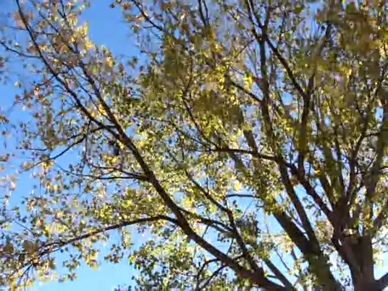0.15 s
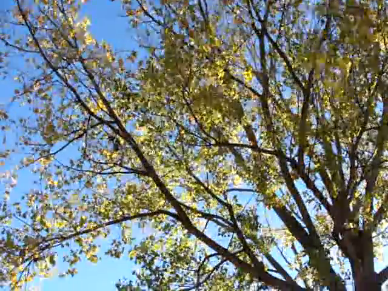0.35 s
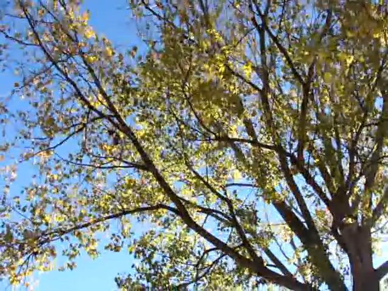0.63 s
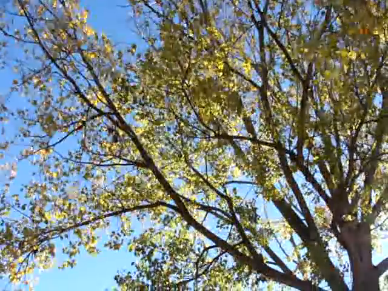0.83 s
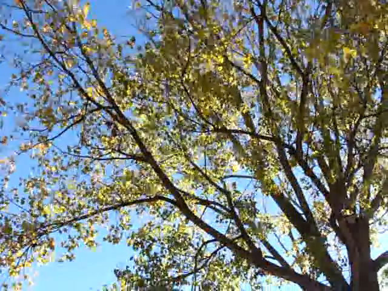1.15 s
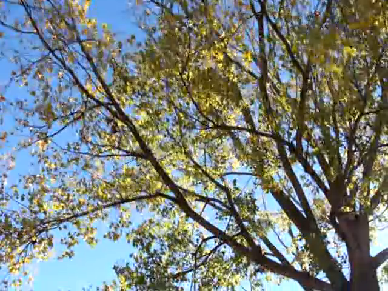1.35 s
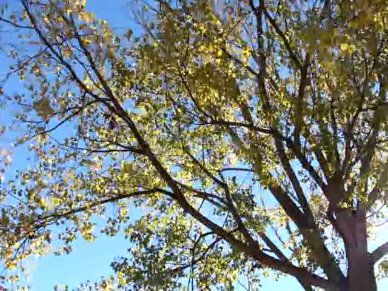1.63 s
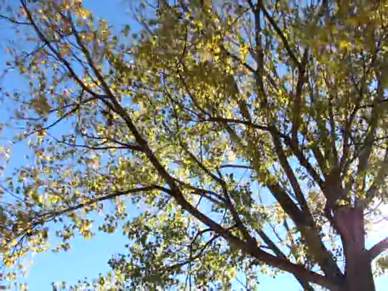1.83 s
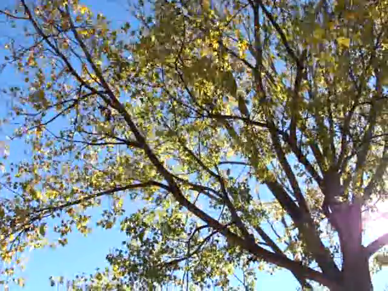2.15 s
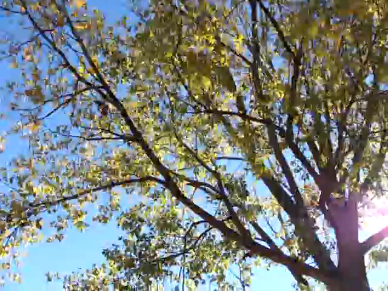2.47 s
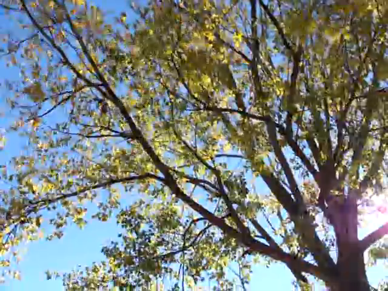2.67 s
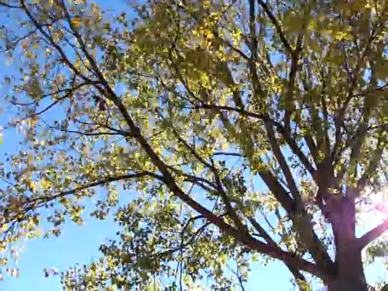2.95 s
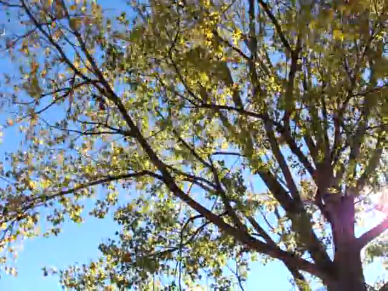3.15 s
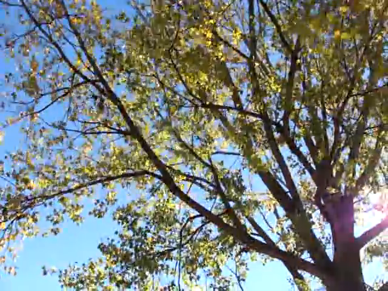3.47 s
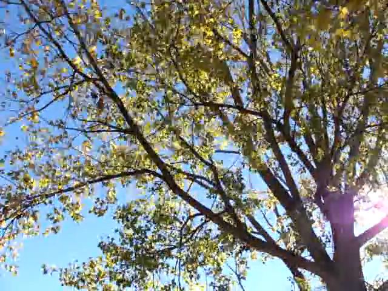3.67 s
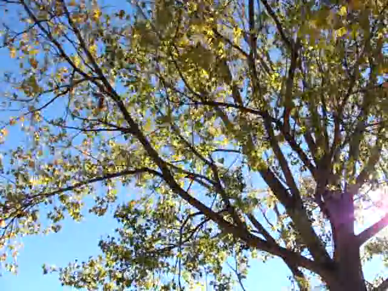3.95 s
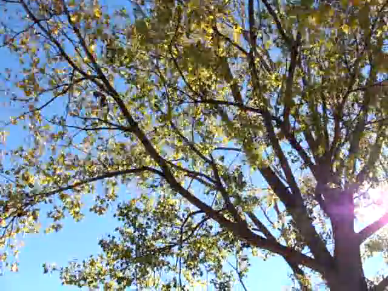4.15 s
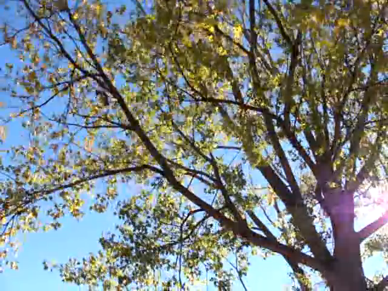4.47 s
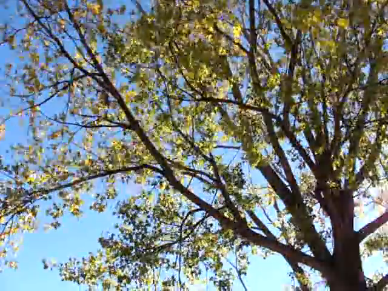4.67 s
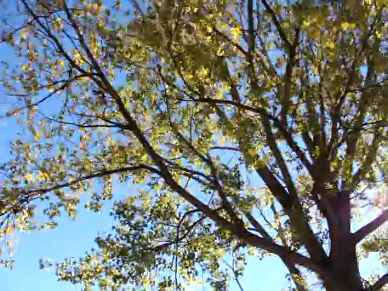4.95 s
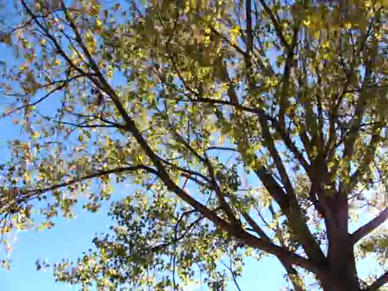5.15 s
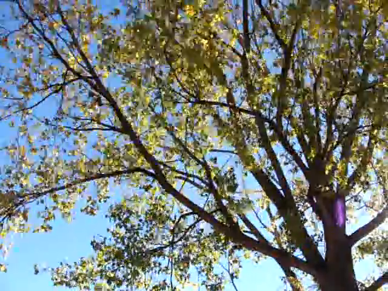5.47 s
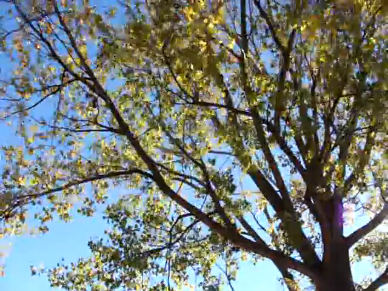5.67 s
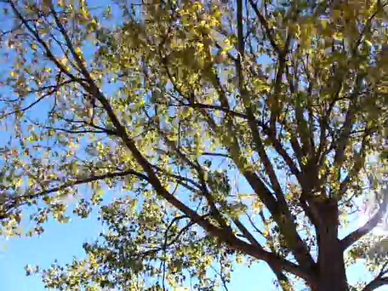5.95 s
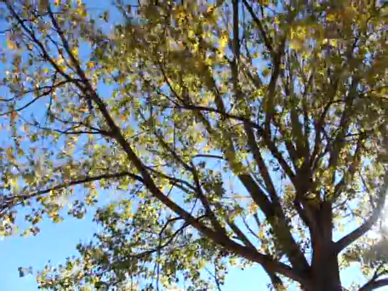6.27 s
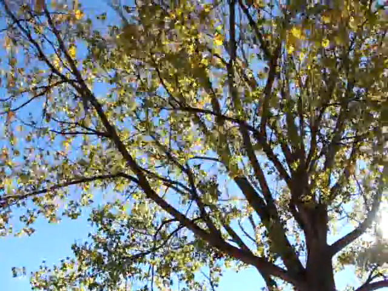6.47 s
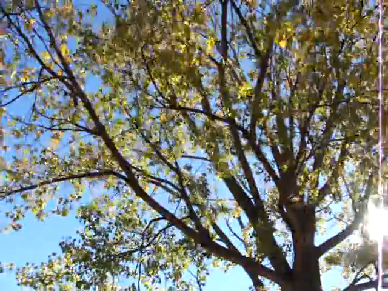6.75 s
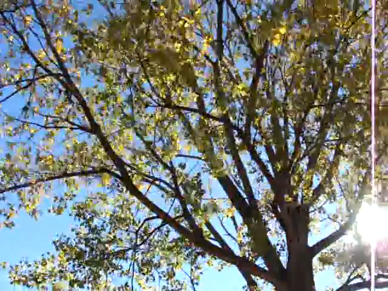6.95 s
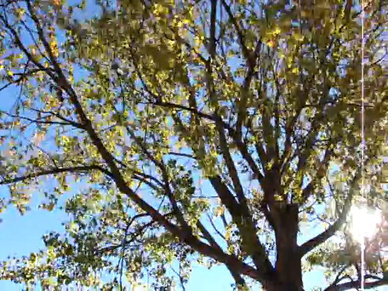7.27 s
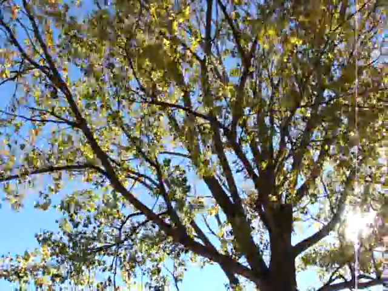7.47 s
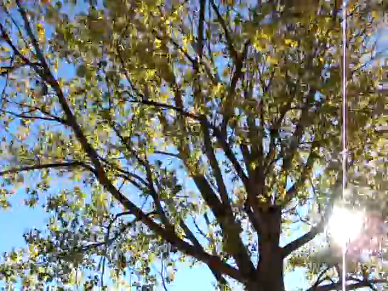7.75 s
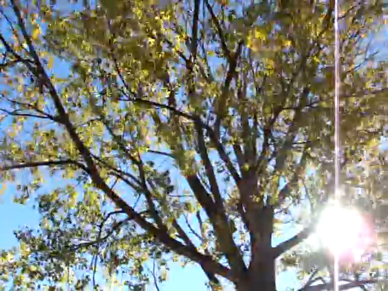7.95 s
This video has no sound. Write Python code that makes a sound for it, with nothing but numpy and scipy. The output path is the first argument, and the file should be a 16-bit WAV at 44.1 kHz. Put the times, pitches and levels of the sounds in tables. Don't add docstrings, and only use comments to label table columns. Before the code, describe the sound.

A continuous dry rustle of countless leaves fills about eight seconds outdoors, a mid-high hiss with fine crackling taps over a faint, dull, distant murmur of air. It begins soft, rises gradually, and levels off from about 5.3 seconds to the end. Low wind noise strikes the small single microphone in irregular lumps: soft puffs and thumps from 0.1 to 1.2 seconds, then a calmer stretch of mostly leaves. A short buffet comes around 3.2 to 3.4, followed by another lull. From about 4.7 the gusts strengthen, with rumbling flutter and heavy, blunt thumps, strongest near 5.2 to 5.3 and again 5.7 to 6.1. One more knock falls near 6.4, then gentler puffs around 6.8, 7.1 and 7.6, and a little rumble at the end. The sound is centred and close, with coarse, slightly watery, cut-off treble and no reverberation.

```python
import sys
import numpy as np
from scipy import signal
from scipy.fft import rfft, irfft, next_fast_len
from scipy.io import wavfile
from scipy.ndimage import uniform_filter1d, map_coordinates

SR = 44100
rng = np.random.default_rng(int(sys.argv[2]) if len(sys.argv) > 2 else 0)


def field_ratio(decibels):
    return 10 ** (np.asarray(decibels, dtype=float) / 20)


def persist_wave(psi):
    counts = np.round(np.clip(psi, -1, 1) * 32767).astype(np.int16)
    wavfile.write(sys.argv[1], SR, np.atleast_2d(counts).T)


N = 357651


def unit(x):
    return x / np.sqrt(np.mean(x ** 2) + 1e-20)


def curves(rows):
    s, *columns = np.transpose(rows)
    return [np.interp(np.arange(N) / SR, s, column) for column in columns]


def wobble(knots_per_s):
    return map_coordinates(rng.standard_normal(1000), [np.arange(N) * min(knots_per_s, 120) / SR])


def filtered(x, response):
    size = next_fast_len(N + 8192)
    gain = response(np.fft.rfftfreq(size, 1 / SR))
    return irfft(rfft(x, size) * gain, size)[..., :N]


def coloured(x, spectrum):
    point_hz, point_db = np.transpose(spectrum)
    return unit(filtered(x, lambda hz: field_ratio(np.interp(np.log(hz + 1), np.log(point_hz + 1), point_db))))


def patchy(depth_db):
    bins = signal.stft(rng.standard_normal(N), nperseg=512)[2]
    field = uniform_filter1d(rng.standard_normal(bins.shape), size=10, axis=0)
    field = uniform_filter1d(field, size=7, axis=1)
    return unit(signal.istft(bins * field_ratio(depth_db * unit(field)), nperseg=512)[1][:N])


def steady(x, size):
    power = uniform_filter1d(uniform_filter1d(x ** 2, size), size)
    return unit(x / np.sqrt(np.abs(power) + .05))


# time in seconds, leaf level in dB.
GUST_LEVELS = [(0, -44.5), (.16, -44), (1.31, -41.5), (1.42, -40.5), (1.85, -41), (2.08, -39.5), (2.5, -40),
               (3.45, -38), (3.97, -38), (5.26, -34), (5.69, -34.5), (6.19, -34), (6.78, -34.5),
               (8.11, -34)]
# frequency in Hz, density in dB per Hz.
LEAF_SPECTRUM = [(530, -38.5), (900, -5), (1170, -9), (1550, -6), (1680, -5), (2560, 1), (3540, 1),
                 (4330, -1.5), (8670, -12), (9980, -15.5), (13000, -57.5), (22000, -120)]
# frequency in Hz, density in dB per Hz.
AIR_SPECTRUM = [(20, -30), (80, -21.5), (130, -12.5), (270, -5), (600, 0.5), (900, -4), (1300, -2.5),
                (2000, -9.5), (4000, -12.5), (10000, -42)]


def crown():
    air_mean_db, air_db_per_wind_db, crisp_db_per_wind_db = -43.5, 0.27, .03
    leaves_db, = curves(GUST_LEVELS)
    swell_db = leaves_db - leaves_db.mean()

    when, size, side = rng.random((3000, 3)).T
    tap_push = np.sign(side - .5) * (1 - size) ** -.25
    taps = np.bincount((when * N).astype(int), tap_push, N)
    rustle = coloured(patchy(depth_db=.3) + field_ratio(-11) * unit(taps), LEAF_SPECTRUM)
    crisp = filtered(rustle, lambda hz: hz ** 4 / (hz ** 4 + 4800. ** 4))
    rustle = rustle + (field_ratio(crisp_db_per_wind_db * swell_db) - 1) * crisp

    shaking_db = 0.18 * wobble(14) + 0.23 * wobble(30)
    air = coloured(patchy(depth_db=1.0), AIR_SPECTRUM)
    air_gain = field_ratio(air_mean_db + air_db_per_wind_db * swell_db)
    return field_ratio(leaves_db + 1.19 + shaking_db) * rustle + air_gain * air


# time in seconds, rumble in dB, whirl in dB over the rumble.
PORT_WIND = [(0, -61, -.1), (.5, -63, -3), (1.15, -53, -5), (1.25, -68, 1.5), (2.66, -70, 3),
             (2.72, -59, -3), (2.93, -70, 5), (3.3, -51, -3), (3.6, -65, -5), (4.62, -58, 5),
             (4.8, -47, -2), (5.6, -42, 2.3), (6.2, -41.5, 0), (6.36, -39, -1), (7.15, -48, -4),
             (7.3, -52, -4), (7.8, -50, 2), (8.04, -43.5, 0.5)]
# time in seconds, rumble in dB, length in ms, whirl in dB over the rumble.
PORT_PUFFS = [(.13, -48.5, 210, -2), (.37, -53, 53, -4), (.61, -38, 90, -4.5), (.81, -39.5, 56, -10),
              (.91, -43, 70, -19), (1.03, -41, 51, -9), (1.12, -42.5, 87, 3.5), (3.03, -47, 73, -3.5),
              (3.21, -39.5, 64, -5), (3.3, -37.5, 57, -.1), (3.4, -42.5, 30, -4), (3.69, -56, 96, 1),
              (3.88, -58, 130, -4), (4.22, -56, 200, -.1), (4.42, -56, 48, 9), (4.52, -50, 60, -11),
              (4.74, -44, 90, 9), (4.93, -37.5, 190, 0.5), (5.11, -37, 32, -3), (5.205, -41, 57, 11),
              (5.34, -42, 290, 5), (5.51, -39.5, 89, -0.5), (5.745, -38, 46, 6), (5.8, -33, 85, -5),
              (5.9, -35.5, 60, -0.5), (6.01, -45, 45, -1), (6.67, -39.5, 140, -3), (6.82, -35.5, 32, -10),
              (7.09, -37.5, 130, -8), (7.59, -42, 46, 0)]


def buffeting():
    steady_db, steady_whirl_db = curves(PORT_WIND)
    t = np.arange(N) / SR
    bells = np.array([field_ratio(2 * db) * np.exp(-((t - s) / (ms * 0.0004)) ** 2) for s, db, ms, _ in PORT_PUFFS])
    whirls = field_ratio(2 * np.array(PORT_PUFFS)[:, -1])
    push_power = field_ratio(2 * steady_db) + bells.sum(axis=0)
    whirl_power = field_ratio(2 * (steady_db + steady_whirl_db)) + whirls @ bells
    return 10 * np.log10([push_power, whirl_power])


# time in seconds, peak in dB, pitch in Hz, length in ms.
STRONG_EDDIES = [(.121, -28.5, 195, 6.2), (0.612, -26.5, 140, 8.1), (0.627, -26, 267, 7),
                 (0.812, -28, 131, 11), (1.111, -31, 170, 20), (1.13, -27, 191, 6.1),
                 (1.155, -33, 190, 7.5), (3.209, -22, 162, 12.5), (3.293, -32, 182, 4),
                 (3.275, -26, 119, 16), (4.745, -25, 216, 13), (4.915, -26, 198, 19), (5.671, -25, 145, 20),
                 (5.025, -21.5, 170, 7.7), (5.197, -13, 210, 6.2), (5.83, -23, 132, 12),
                 (5.265, -12.5, 247, 7.7), (5.309, -12, 184, 6.5), (5.735, -21, 380, 5),
                 (5.471, -18.5, 157, 4.9), (5.565, -23.5, 229, 4.8), (5.744, -18, 467, 5.3),
                 (5.749, -17, 260, 8.2), (5.764, -13, 278, 2.7), (5.881, -15, 260, 10.3),
                 (5.994, -16.5, 199, 6.5), (6.082, -23.5, 146, 18), (6.136, -19.5, 170, 4.5),
                 (6.367, -18, 182, 4.3), (7.585, -38, 130, 6.8)]


def all_eddies(whirl_db):
    core_db, core_pitch_ratio, core_ms = -9, 1.88, 3.5
    s, db, hz, ms = np.transpose(STRONG_EDDIES)
    core_s = s + 0.00194 * rng.standard_normal(len(s))
    cores = np.transpose([core_s, db + core_db, hz * core_pitch_ratio, core_ms + 0 * ms])

    over_whirl_db, scatter_db = 6, 10.5
    mean_hz, hz_per_db, pitch_spread, turns = 163.5, 2, 0.37, 1.37
    when = (np.arange(200) + rng.random(200)) / 26 + .1
    size, pitch = rng.random(200), rng.standard_normal(200)
    here_db = whirl_db[(when * SR).astype(int)]
    small_hz = np.maximum(mean_hz + hz_per_db * (here_db + 41.5), 80) * np.exp(pitch_spread * pitch)
    small_db = here_db + over_whirl_db + scatter_db * size
    small = np.transpose([when, small_db, small_hz, 1000 * turns / small_hz])
    return [*STRONG_EDDIES, *cores, *small]


# frequency in Hz, density in dB per Hz.
RUMBLE_SPECTRUM = [(10, -40), (25, -11.5), (50, -2), (80, -1.5), (120, -3), (200, -23), (400, -54),
                   (1000, -120)]
# frequency in Hz, density in dB per Hz.
FLUTTER_SPECTRUM = [(40, -44), (90, -9), (140, -7), (220, -0.5), (350, -9.5), (500, -14.5), (1000, -66),
                    (3000, -120)]


def port():
    flutter_db, flutter_db_per_whirl_db, flutter_floor_db = -44.5, 1.36, -60
    rumble_db, whirl_db = buffeting()
    flutter_gain = field_ratio(flutter_floor_db) + field_ratio(flutter_db + flutter_db_per_whirl_db * (whirl_db + 40.5))

    lumps = wobble(30)
    rumble = field_ratio(3.5 * lumps) * coloured(rng.standard_normal(N), RUMBLE_SPECTRUM)
    rumble = steady(rumble, size=1600)
    flutter = field_ratio(2.1 * lumps + 4.6 * wobble(60)) * coloured(rng.standard_normal(N), FLUTTER_SPECTRUM)
    flutter = steady(flutter, size=1600)
    out = field_ratio(rumble_db + 0.3) * rumble + flutter_gain * flutter

    t = np.arange(-2000, 2000) / SR
    for (s, db, hz, ms), turn in zip(all_eddies(whirl_db), rng.random(300)):
        swell = np.exp(-(t / (ms * 0.00043)) ** 2)
        push = swell * np.cos(2 * np.pi * (hz * t + turn))
        push = push - swell * push.sum() / swell.sum()
        out[round(s * SR) + np.arange(len(t)) - len(t) // 2] += field_ratio(db - 1.55) * push
    return out


def scene():
    return np.tile(crown() + port(), (2, 1))


def coarse_treble(x, headroom):
    n, k = np.arange(512) - 255.5, np.arange(10, 20)[:, None]
    u = np.linspace(0, 1, 200)[:, None]
    shape = (np.cos(np.pi / 2 * np.sin(np.pi / 2 * u) ** 2) * np.cos(np.pi * u * n / 32)).sum(0)
    bank = shape * np.cos((2 * k + 1) * np.pi * n / 64 + (-1.) ** k * np.pi / 4)
    bank = bank / np.linalg.norm(bank, axis=1, keepdims=True)

    slow = np.pad(signal.resample_poly(x, 320, 441), (0, 1664))
    at = np.arange(len(slow) // 1152 * 36 - 36)[:, None] * 32 + np.arange(512)
    bands = slow[at] @ bank.T
    peak = np.abs(bands).reshape(-1, 3, 12, len(k)).max(2, keepdims=True)
    scale = np.maximum(peak, headroom * peak.max(1, keepdims=True))
    step = (2 / 3 * scale * np.ones((12, 1))).reshape(bands.shape) + 1e-9
    error = step * np.clip(np.round(bands / step), -1, 1) - bands
    slow_error = np.bincount(at.ravel(), (error @ bank).ravel(), len(slow))
    return x + signal.resample_poly(slow_error, 441, 320)[:N]


# frame number, low edge in Hz.
NOISE_PATCHES = [(15, 5600), (15, 6900), (87, 6230), (106, 4150), (132, 4130), (135, 4130), (135, 5610),
                 (135, 7510), (142, 7510), (156, 5100), (168, 4150), (168, 8240), (200, 4130), (200, 5900),
                 (218, 4130), (218, 5000), (218, 8270), (227, 4160), (227, 6830), (291, 4580), (291, 8230),
                 (328, 5080), (333, 5120)]


def swap_treble(x):
    frame_samples, first_sample, width_hz = 1024, 59, 1400
    window = np.sin(np.pi * (np.arange(2 * frame_samples) + .5) / (2 * frame_samples)) ** 3
    hz = np.fft.rfftfreq(2 * frame_samples, 1 / SR)
    for frame, low_hz in NOISE_PATCHES:
        span = slice(first_sample + (frame - 1) * frame_samples, first_sample + (frame + 1) * frame_samples)
        band = (hz > low_hz) & (hz < low_hz + width_hz)
        old = irfft(rfft(x[:, span]) * band)
        new = irfft(rfft(rng.standard_normal(old.shape)) * band)
        fade_out = 1 - np.sqrt(1 - window ** 2)
        x[:, span] += window * field_ratio(-.8) * np.std(old) * unit(new) - fade_out * old
    return x


def roll_off(x):
    return signal.sosfilt(signal.butter(12, 10130, fs=SR, output="sos"), x)


def record(dry):
    x = np.tile(coarse_treble(dry[0], headroom=1.2), (2, 1))
    x = filtered(x, lambda hz: field_ratio(-np.clip((hz - 9920) / 44, 0, 12) ** 2))
    x = swap_treble(x)
    return roll_off(x)


dry = scene()
out = record(dry)
persist_wave(out)
```